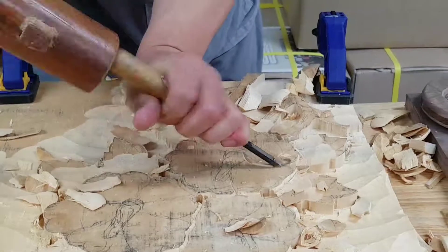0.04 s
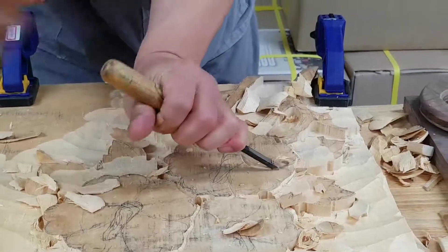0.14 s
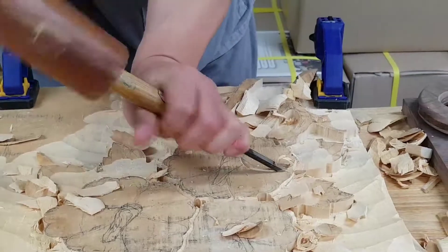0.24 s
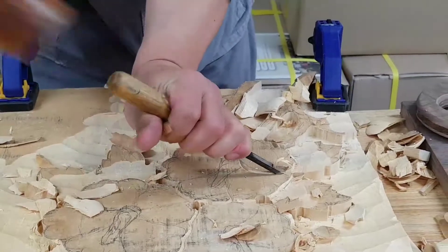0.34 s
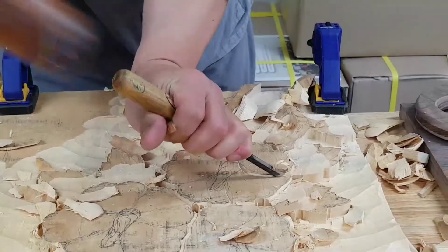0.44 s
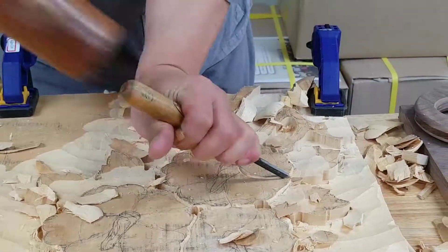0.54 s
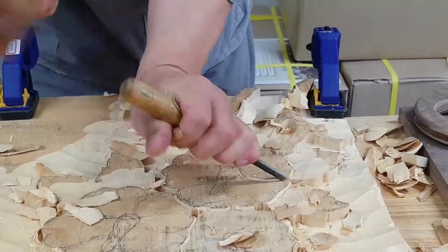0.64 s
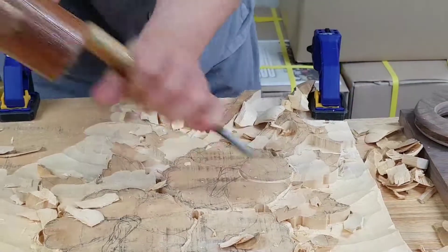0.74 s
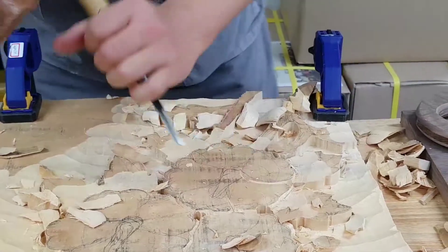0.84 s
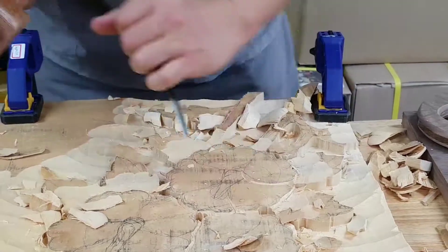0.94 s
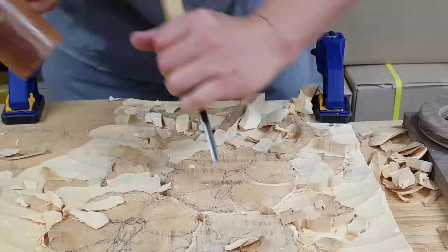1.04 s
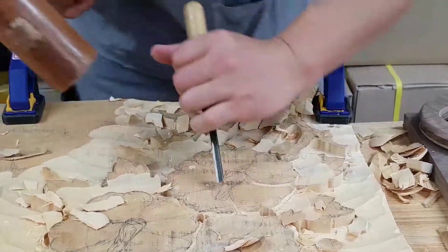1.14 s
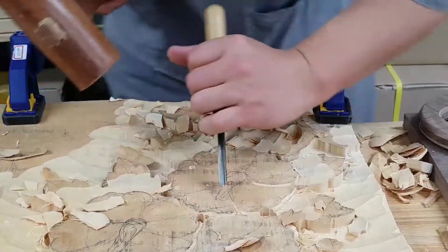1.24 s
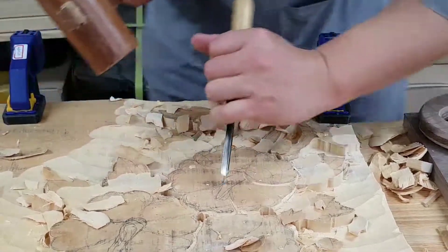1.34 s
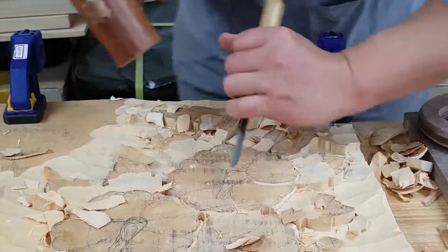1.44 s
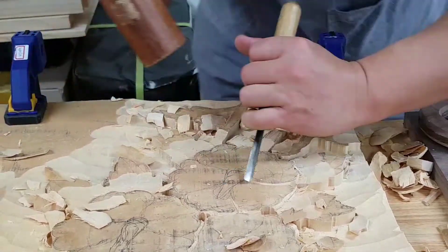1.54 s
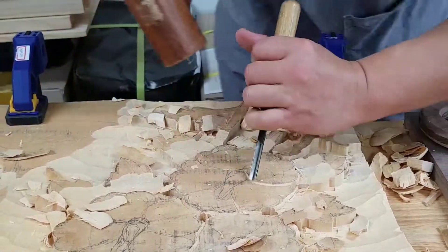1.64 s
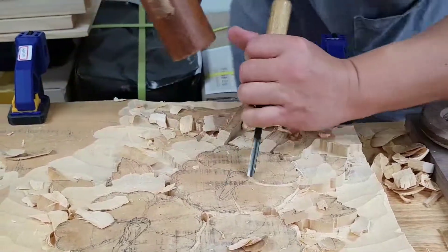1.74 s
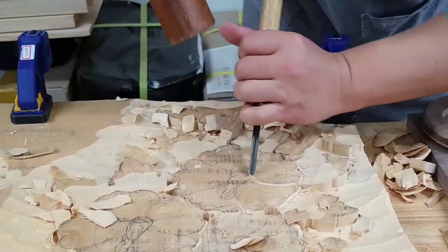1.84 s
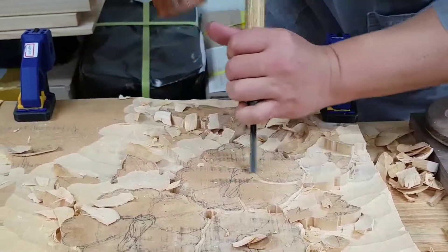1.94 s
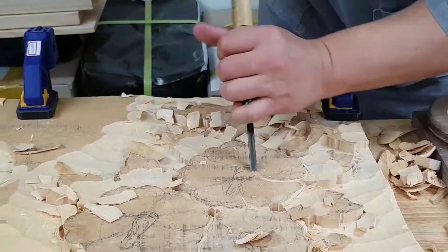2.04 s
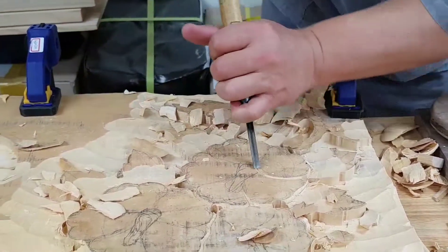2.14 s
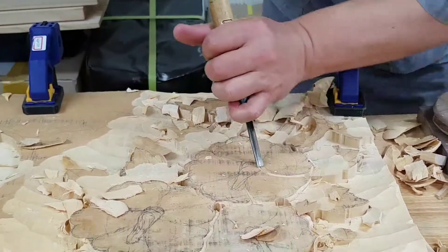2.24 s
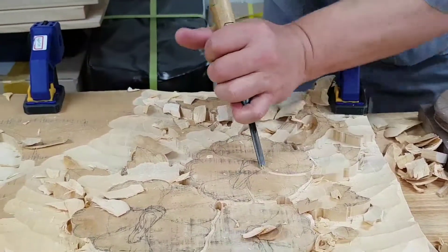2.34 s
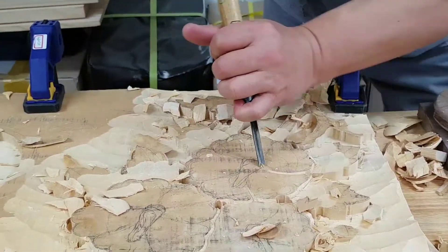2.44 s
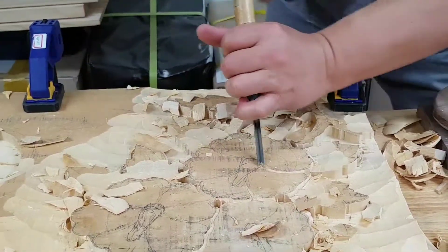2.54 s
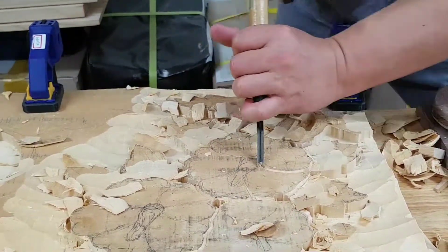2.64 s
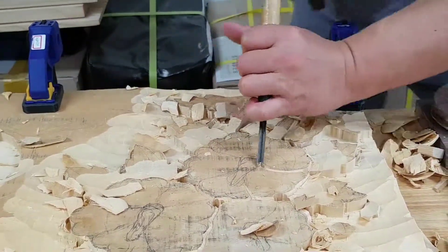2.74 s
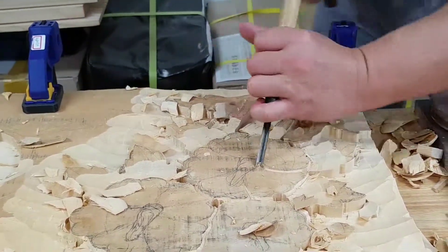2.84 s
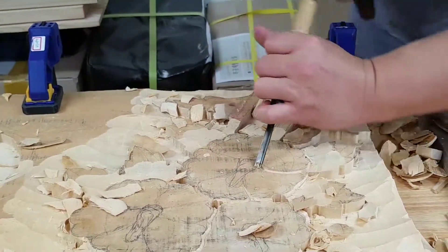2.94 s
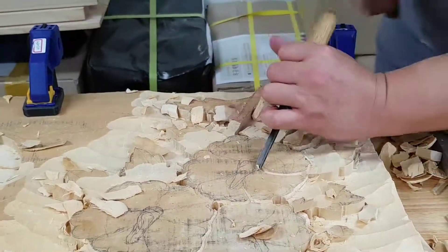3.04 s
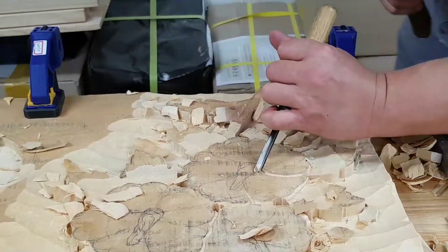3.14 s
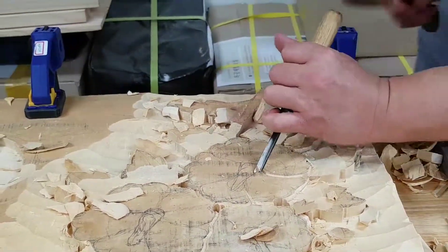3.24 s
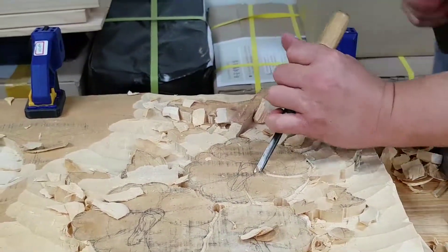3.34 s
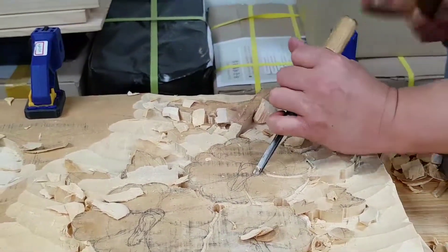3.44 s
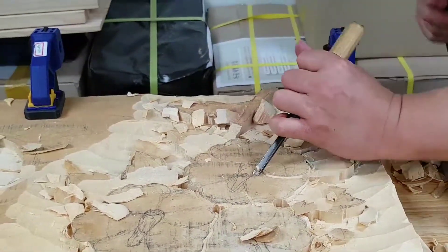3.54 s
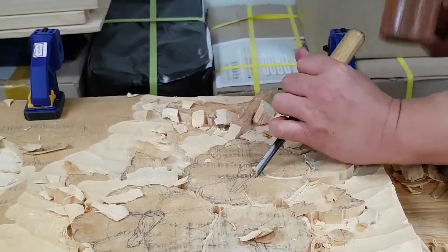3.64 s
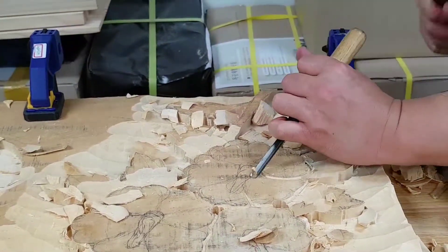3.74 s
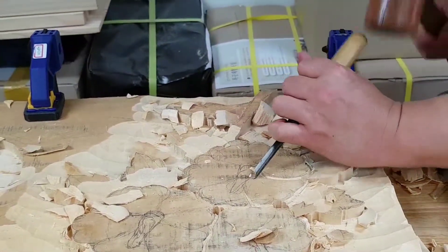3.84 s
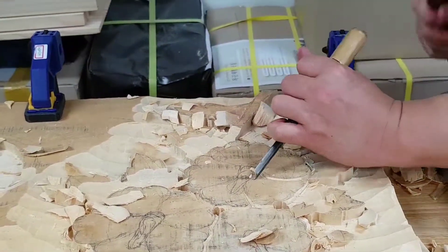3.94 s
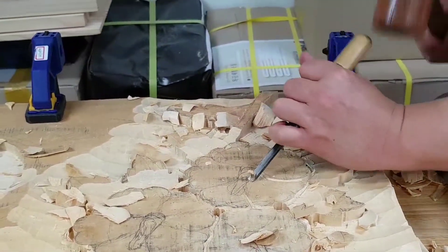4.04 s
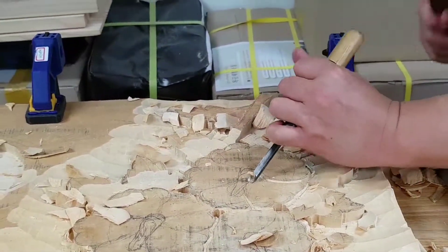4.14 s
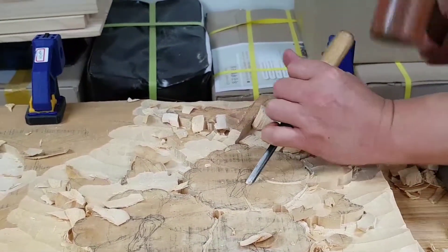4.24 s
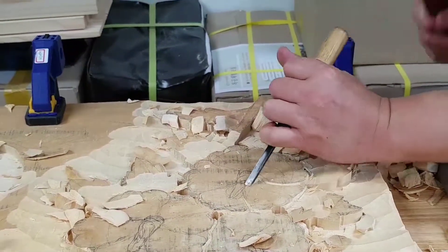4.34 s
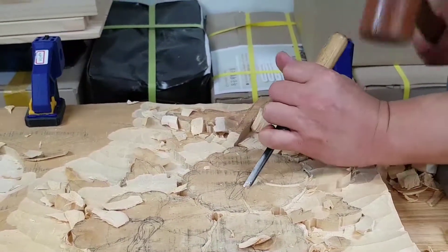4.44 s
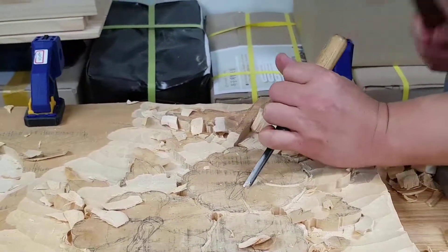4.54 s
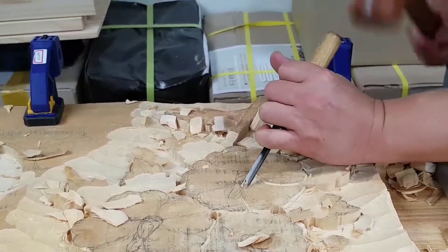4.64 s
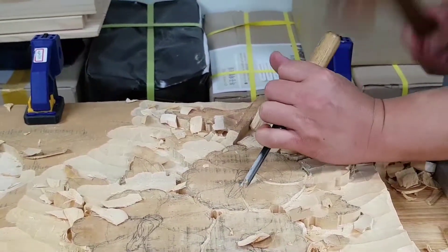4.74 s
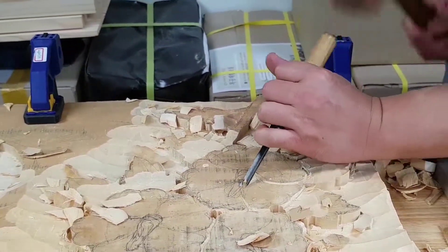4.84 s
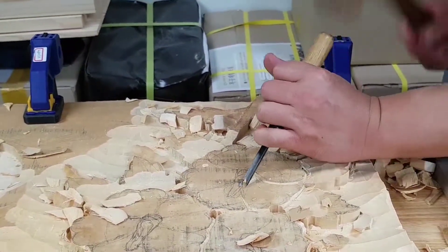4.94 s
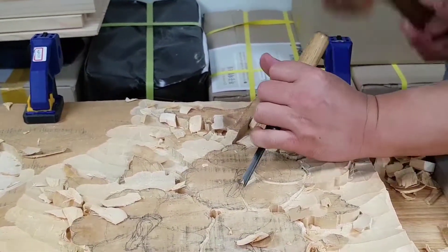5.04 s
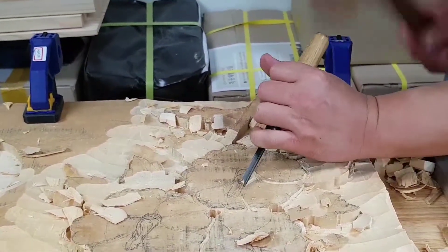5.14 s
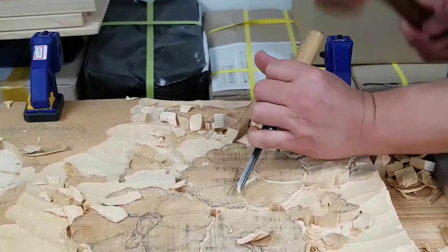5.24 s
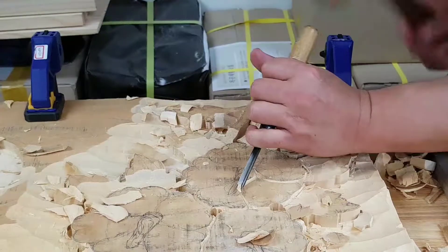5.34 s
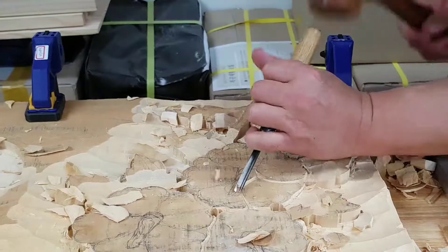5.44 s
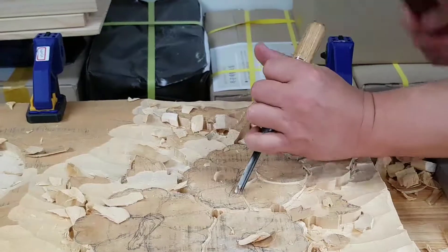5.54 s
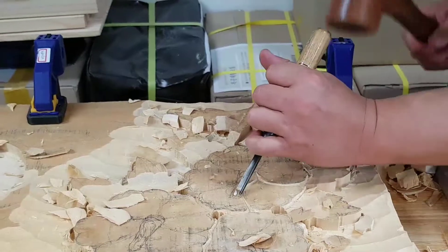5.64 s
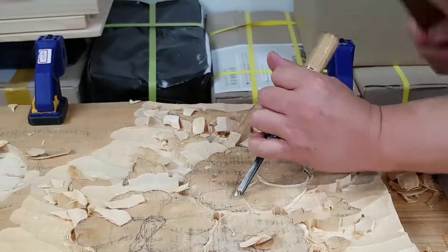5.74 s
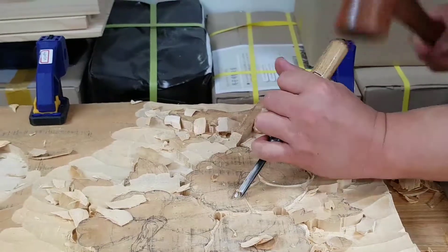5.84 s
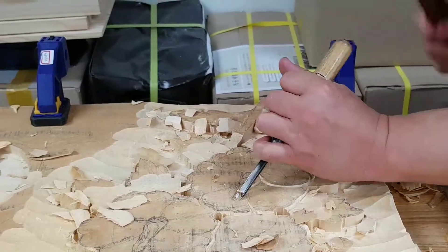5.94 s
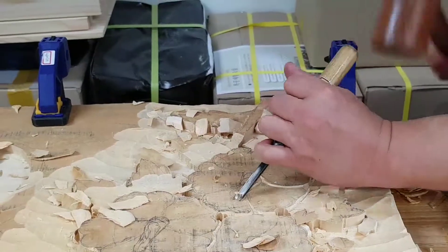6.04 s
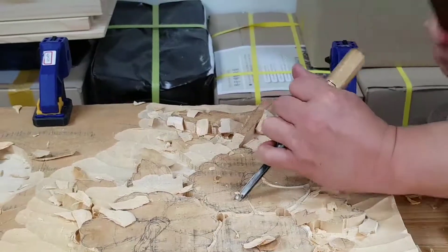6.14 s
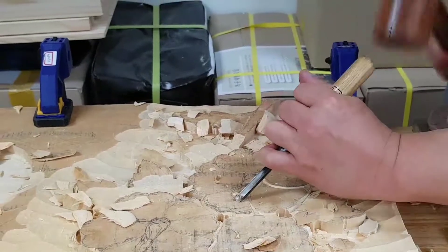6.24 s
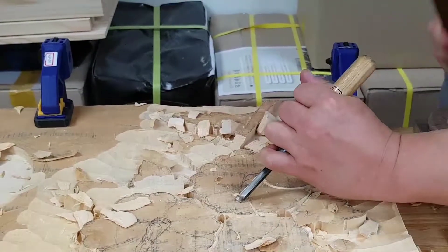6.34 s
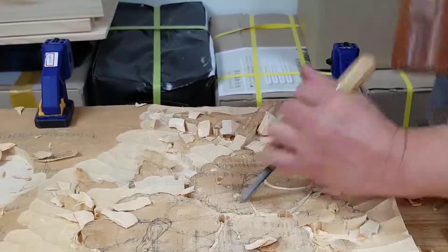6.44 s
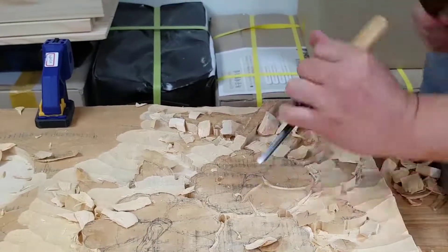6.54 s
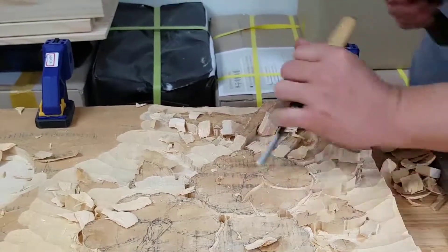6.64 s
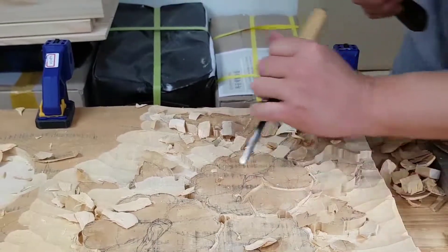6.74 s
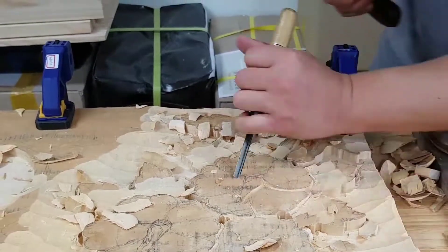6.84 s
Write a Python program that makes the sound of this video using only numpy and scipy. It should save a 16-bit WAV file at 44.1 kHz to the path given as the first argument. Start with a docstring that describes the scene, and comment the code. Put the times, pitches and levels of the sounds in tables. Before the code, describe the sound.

A wooden mallet knocks a carving chisel into a plank: three bright splintery strokes, a pause, then a long even run of dull woody hits.

```python
"""Mallet and chisel on a plank

A wooden mallet drives a carving chisel into a plank clamped to a bench: three strokes, a pause to
reset the blade, then a long even run. Each stroke sums a minimum-phase crack of wood on wood, decaying
modes of plank and bench, and a short wash of shaped noise with dull reflections from the workshop.
Around the strokes the tool touches the wood (short wash) and the steel clinks (modes and noise), over
low room noise, humming sines and a swelling hiss; a saturating recorder rounds off the peaks."""
import sys
import numpy as np
from scipy import signal
from scipy.fft import rfft, irfft
from scipy.io import wavfile
from scipy.ndimage import uniform_filter1d

SR = 44100
rng = np.random.default_rng(int(sys.argv[2]) if len(sys.argv) > 2 else 0)


def file_out(sig):
    """Save sig as 16-bit WAV at sys.argv[1]."""
    # one column per channel
    cols = np.atleast_2d(sig).T
    # limit, then scale
    lim = np.clip(cols, -1, 1)
    pcm = np.round(lim * 32767).astype(np.int16)
    wavfile.write(sys.argv[1], SR, pcm)


N = 303760
RING = 16384  # length of one ringing response, samples


def amp(db):
    """Level to amplitude: 20 dB is a factor of ten."""
    return 10 ** (np.asarray(db) / 20)


def read(points, hz):
    """Interpolation on a log-frequency axis: a table's value at hz."""
    f, value = np.transpose(points)
    return np.interp(np.log(hz + 1), np.log(f + 1), value)


def add(mix, s, sound):
    """Superposition: a sound is added to the mix from time s onward."""
    part = mix[:, max(round(s * SR), 0):][:, :sound.shape[-1]]
    part += sound[..., :part.shape[1]]


def bump(hz, centre_hz, width_hz):
    """Gaussian resonance curve of height 1 around centre_hz."""
    return np.exp(-((hz - centre_hz) / width_hz) ** 2)


def pulse(points):
    """Minimum phase: the most compact causal click with this magnitude spectrum."""
    hz = abs(np.fft.fftfreq(4096, 1 / SR))
    log_gain = np.log(amp(read(points, hz)))
    # the Hilbert transform of the log gain supplies the phase
    spectrum = np.exp(np.conj(signal.hilbert(log_gain)))
    return np.fft.ifft(spectrum).real[:2048]


# correlation of the two channels: f/Hz, correlation/1
CHANNEL_LIKENESS = [(100, 1), (300, 0.85), (600, 0.51), (2000, 0.25), (5000, .22), (14000, 0.4)]


def noise(points, size):
    """Partial coherence: shaped stereo noise whose channels are nearly alike in the bass."""
    hz = np.fft.rfftfreq(size, 1 / SR)
    same = read(CHANNEL_LIKENESS, hz)
    shares = np.sqrt([(1 + same) / 2, (1 - same) / 2])
    mid, side = rfft(rng.standard_normal((2, size))) * shares
    return irfft(np.array([mid + side, mid - side]) * amp(read(points, hz)), size)


# spectrum shape of the hiss: f/Hz, relative level/dB
HISS_COLOUR = [(100, -21), (1000, 6.5), (4000, 8.5), (7500, 7.5), (11000, 1.5), (16000, -3.5)]
# swells of the hiss: start t/s, length/s, level at the start/dB
SWELLS = [(.83, 0.055, -64), (1.43, .58, -57), (3.15, 0.26, -57.5), (4.95, 0.051, -60.5),
          (6.71, 0.013, -61.5)]
HISS_REST_DB = -74.5  # between swells
SWELL_IN_DB_PER_S, SWELL_GROW_DB_PER_S, SWELL_OUT_DB_PER_S = 200, 10, 193


def hiss():
    """Incoherent power addition: each swell adds its power to a faint resting hiss."""
    t, x = np.arange(N) / SR, noise(HISS_COLOUR, N)
    level = amp(HISS_REST_DB)
    for start, length, db in SWELLS:
        fade_in_db = SWELL_IN_DB_PER_S * np.maximum(start - t, 0)
        fade_out_db = SWELL_OUT_DB_PER_S * np.maximum(t - start - length, 0)
        growth_db = SWELL_GROW_DB_PER_S * np.clip(t - start, 0, length)
        level = np.hypot(level, amp(db + growth_db - fade_in_db - fade_out_db))
    return x / x.std() * level


# spectrum shape of the quiet workshop: f/Hz, relative level/dB
FLOOR_COLOUR = [(20, -17), (70, -14), (95, -11), (113, 5), (135, -9.5), (170, -11), (240, -7.5),
                (310, -13.5), (550, -10.5), (850, -18), (2500, -24.5), (3500, -39.5), (16000, -61)]
# level of the workshop noise: t/s, level/dB
FLOOR_LEVEL = [(0, -46.5), (.8, -53.5), (1.52, -54), (1.68, -47.5), (2.3, -48), (4.2, -57.5), (6.89, -54.5)]
# a machine's hum: f/Hz, level against the workshop noise/dB
HUM = [(113, -8), (240, -12.5)]


def workshop():
    """Broadband and tonal background: room noise and humming sines share one slow level curve."""
    t, x = np.arange(N) / SR, noise(FLOOR_COLOUR, N)
    hum = 0
    for hz, db in HUM:
        phase = 2 * np.pi * (hz * t + rng.random())
        hum = hum + amp(db) * np.sqrt(2) * np.sin(phase)  # sqrt(2): sine of unit RMS
    return (x / x.std() + hum) * amp(np.interp(t, *np.transpose(FLOOR_LEVEL)))


def ring(modes, detune, spread_db=5.0, rise_s=0.0014):
    """Modal superposition: decaying waves start together, each varied a little, the high ones most in level."""
    hz, db, t60 = np.transpose(modes)[:, :, None]
    t = np.arange(RING) / SR
    shift, strength = rng.standard_normal((2, *hz.shape))
    db = db + spread_db * strength * hz / (hz + 300)
    shifted_hz = hz * (1 + detune * shift)
    waves = amp(db - 60 * t / t60) * np.cos(2 * np.pi * shifted_hz * t)
    return waves.sum(0) * (1 - np.exp(-t / rise_s))


# dense ring of wood and room, with a hollow just above the bench's thud: f/Hz, level/dB
WASH_COLOUR = [(30, 0), (70, 25), (135, 30), (172, 22), (230, 23), (500, 24), (800, 26), (1400, 23),
               (2800, 18), (4000, 10.5), (7000, 4), (9400, -4), (10400, -3.5), (16000, -24)]
# how long the wash lasts: f/Hz, t60/s
WASH_DECAY = [(80, 0.37), (250, 0.4), (550, 0.32), (1400, 0.25), (3500, 0.25), (7000, 0.29), (14000, 0.27)]


def wash(early_db=3, early_s=0.0076, rise_s=0.00082):
    """Diffuse decay: dense ringing is strong at first, then each band dies at its own rate."""
    hz, t, z = signal.stft(noise(WASH_COLOUR, RING), SR, nperseg=256)
    early = 1 + amp(early_db) * np.exp(-t / early_s)
    fade = amp(-60 * t / read(WASH_DECAY, hz)[:, None]) * early
    # equal fade energy in every band, so decay time does not alter the colour
    fade /= np.sqrt((fade ** 2).sum(1, keepdims=True) * t[1] * SR)
    tail = signal.istft(z * fade, SR, nperseg=256)[1][:, :RING]
    return tail * (1 - np.exp(-np.arange(RING) / SR / rise_s))


# light touches of the tool on the plank: t/s, level/dB
TOUCHES = [(0.017, -30.5), (1.623, -37), (1.997, -25.5), (6.878, -27)]
# clinks of the steel: t/s, level/dB
CLINKS = [(5.957, -45), (5.971, -36)]
# modes of the blade: f/Hz, level/dB, t60/s
BLADE_MODES = [(4200, -11, .1), (4420, -11, .09), (7470, 0, .06), (7700, -10, .09), (10600, -17, .08)]
# the edge scraping as it clinks: f/Hz, level/dB
SCRAPE_COLOUR = [(1500, -33), (4000, -8), (8000, -7), (11000, -8), (13000, -25)]


def handling(dull_db=-6, scrape_s=0.016):
    """Light contact excitation: the tool brushes the plank, and the loose blade scrapes and clinks."""
    out, soft = np.zeros((2, N)), pulse([(2000, 0.0097), (6000, dull_db)])
    for s, db in TOUCHES:
        add(out, s, amp(db) * signal.fftconvolve(wash(), soft[None], axes=1))
    for s, db in CLINKS:
        scrape = noise(SCRAPE_COLOUR, RING) * np.exp(-np.arange(RING) / SR / scrape_s)
        # separately detuned modes in the two channels
        clink = np.array([ring(BLADE_MODES, detune=0.011), ring(BLADE_MODES, detune=0.0048)])
        add(out, s, amp(db) * (scrape + clink))
    return out


# the nearest walls throw back the dull part of each blow: delay/s, level/dB
ECHOES = [(.008, 0.5), (0.018, -4.5), (0.028, 13), (0.0513, 10), (.074, 1.5)]
# colour of those reflections: f/Hz, level/dB
ECHO_COLOUR = [(40, -29.5), (170, -25.5), (270, -1.5), (520, 3), (900, -6), (2000, -12), (6000, -25),
               (16000, -57.5)]


def echoes():
    """Early reflection: single dull returns reach one ear a little after the other."""
    out, dull = np.zeros((2, RING)), pulse(ECHO_COLOUR)
    for delay, db in ECHOES:
        for ear in (out[:1], out[1:]):
            add(ear, delay + rng.uniform(0, 0.00051), amp(db) * dull)
    return out


# colour of an average stroke with the chisel upright: f/Hz, level/dB
STROKE_COLOUR = [(60, -8), (130, -2), (300, 1), (520, -1.8), (800, -5), (1300, 2), (1800, 7), (3000, 3),
                 (6000, 1.15)]
# a heavy stroke swells the thud of plank and bench, hardly the handle: f/Hz, gain/(dB per dB of weight)
WEIGHT_GAIN = [(70, 0.6), (140, 1.0), (270, 0.9), (480, 1.24), (720, 0.94), (1800, 0.07), (4000, 0.22)]
# fibres giving way add treble and jolt the bench: f/Hz, gain/(dB per dB of splintering)
SPLINTER_GAIN = [(75, 0.48), (150, 0.06), (260, -0.22), (1500, 0.32), (3000, 0.5), (6000, 0.72),
                 (12000, 1.05)]
# the handle knocks hardest upright
KNOCK_HZ, KNOCK_WIDTH_HZ, KNOCK_LOSS_DB_PER_DEG = 1980, 950, 0.1767
# past a certain lean the blade lifts a chip, which sounds hollow
LIFT_DEG, CHIP_HZ, CHIP_WIDTH_HZ, CHIP_DB_PER_DEG = 31.1, 667, 390, 0.5124


def stroke_colour(weight_db, splinter_db, lean):
    """Excitation spectrum: weight, splintering and lean set a stroke's broad balance, as (Hz, dB) rows."""
    hz = np.linspace(0, SR / 2, num=400)
    db = read(STROKE_COLOUR, hz)
    db += weight_db * read(WEIGHT_GAIN, hz)
    db += splinter_db * read(SPLINTER_GAIN, hz)
    db -= KNOCK_LOSS_DB_PER_DEG * lean * bump(hz, KNOCK_HZ, KNOCK_WIDTH_HZ)
    db += CHIP_DB_PER_DEG * max(lean - LIFT_DEG, 0) * bump(hz, CHIP_HZ, CHIP_WIDTH_HZ)
    return np.column_stack([hz, db])


# the handle's broad resonance climbs as it leans
HANDLE_HZ, HANDLE_HZ_PER_DEG = 2393, 20.9


def colouring(colour, lean, share=1, boost_db=1.0, width_hz=330, patchy_db=2.0):
    """Source filtering: a share of the stroke's colour, the handle's resonance, and random treble patches."""
    hz, db = colour.T
    db = share * db + boost_db * bump(hz, HANDLE_HZ + HANDLE_HZ_PER_DEG * lean, width_hz)
    # fibres never part the same way twice
    patches = uniform_filter1d(rng.standard_normal(len(hz)), size=8)
    patches = uniform_filter1d(patches, size=5)
    db = db + patchy_db * patches / patches.std() * hz / (hz + 1500)
    return pulse(list(zip(hz, db)))


# mallet strokes: t/s, weight put into the plank/dB, splintering of the fibres/dB
STROKES = [(0.08, 0.5, 8.5), (0.2849, 1.5, 9), (0.506, -1.5, 9.5), (2.3651, 5.5, 4), (2.594, 4.5, 2),
           (2.8122, 7, 0.5), (3.0278, -3.5, -1.5), (3.2386, 3.5, 1.0), (3.4389, 5.5, 0.5),
           (3.633, -0.5, -0.5), (3.8286, -3, -1), (4.024, -5, -2), (4.222, -3.5, -2.5),
           (4.4187, -1.5, -4.5), (4.6096, 0, -4.5), (4.7954, -2, -0.5), (4.9991, -2.5, 3),
           (5.1977, -3.5, -1.5), (5.402, -2.5, 3.5), (5.6156, 2.0, -3), (5.8133, 2.5, -6.5),
           (6.0202, -1, 1.0), (6.223, -1.0, -0.5), (6.4187, 0, -6.5)]
# the chisel's lean, a flat paring cut, then reset nearly upright and tipped again: t/s, angle from upright/deg
LEAN = [(.5, 50), (2.36, 2.05), (3.2, 30), (4.3, 35.5), (6.0, 27), (6.42, 47)]
# modes of bench, plank and tool: f/Hz, level/dB, t60/s
BENCH_MODES = [(59, -42, .25), (97, -27.5, .24), (118, -31, .18), (133, -25, .16), (145, -16.5, .19),
               (209, -30, .22), (223, -29.5, .22), (245, -22, .23), (266, -22.5, .23), (290, -29.5, .2),
               (332, -26, .23), (358, -28, .22), (385, -31, .2), (425, -27.5, .23), (453, -28.5, .24),
               (479, -32, .24), (533, -28, .24), (650, -36, .22), (710, -37, .2), (1012, -37, .2),
               (1208, -28, .21), (1370, -31, .11), (1545, -34, .13), (1845, -31, .14), (2064, -31, .15),
               (2515, -36, .15), (2622, -37, .15), (2800, -37, .13), (2960, -37, .13), (3430, -40, .14)]
# the mallet meeting the handle: f/Hz, level/dB
CRACK_COLOUR = [(30, -50.5), (250, 27), (650, -14), (1200, 14.5), (1800, 15.5), (2400, 11), (3300, 9),
                (4100, -10.5), (7000, -11.5), (10500, -27), (16000, -38)]
# added level of an average stroke's direct crack, and how much each dB of weight takes away
CRACK_DB, CRACK_LOSS_DB_PER_DB = 5.5, 0.34


def mallet(renew_per_s=1.53, fresh=0.31, crack_share=0.23, low_hz=52):
    """Impact excitation: each stroke cracks and rings; the shared wash changes as the blade moves through wood."""
    out, pattern, walls, last = np.zeros((2, N)), wash(), echoes(), 0
    for s, weight_db, splinter_db in STROKES:
        # power-preserving mixtures of old and new wash
        kept = np.exp(-abs(renew_per_s * (s - last)))
        pattern, last = np.sqrt(kept) * pattern + np.sqrt(1 - kept) * wash(), s
        diffuse = np.sqrt(1 - fresh) * pattern + np.sqrt(fresh) * wash()
        body = ring(BENCH_MODES, detune=0.0055) + diffuse + walls
        lean = np.interp(s, *np.transpose(LEAN))
        colour = stroke_colour(weight_db, splinter_db, lean)
        add(out, s, signal.fftconvolve(body, colouring(colour, lean)[None], axes=1))
        # the direct crack starts with a suction and takes on part of the stroke's colour
        tint = colouring(colour, lean, crack_share)
        crack = signal.fftconvolve(pulse(CRACK_COLOUR), tint)
        add(out, s, -amp(CRACK_DB - CRACK_LOSS_DB_PER_DB * weight_db) * crack)
    # a plank radiates little deep bass
    return signal.sosfilt(signal.butter(4, low_hz, "high", fs=SR, output="sos"), out)


def scene(balance_db=0.33):
    """Level-difference panning: carving a little left of centre, in the workshop's noise, hum and hiss."""
    carving = (mallet() + handling()) * amp([[balance_db], [-balance_db]])
    return carving + workshop() + hiss()


EDGE_HZ = 16300  # upper band edge


def record(dry):
    """Saturation and band limiting: the recorder rounds peaks near full scale and cuts the top treble."""
    rounded = dry / (1 + dry ** 6) ** (1 / 6)
    lowpass = signal.firwin(255, EDGE_HZ, window=("kaiser", 9), fs=SR)
    return signal.oaconvolve(rounded, lowpass[None], "same")


dry = scene()
out = record(dry)
file_out(out)
```